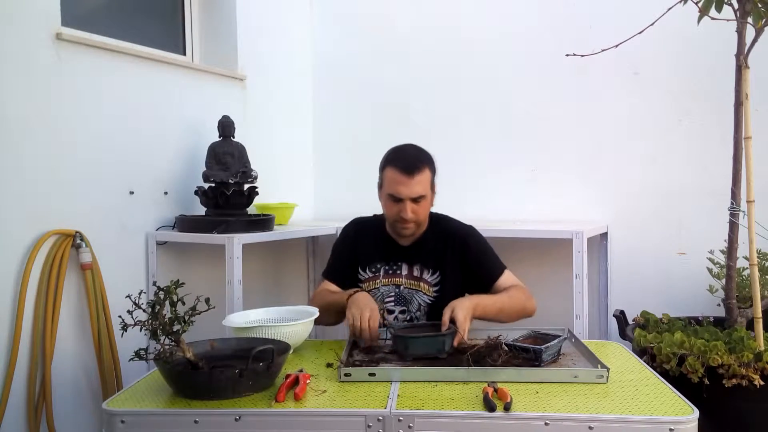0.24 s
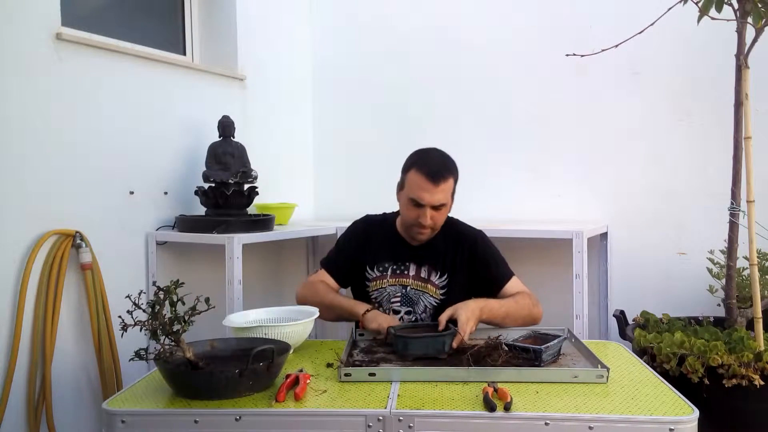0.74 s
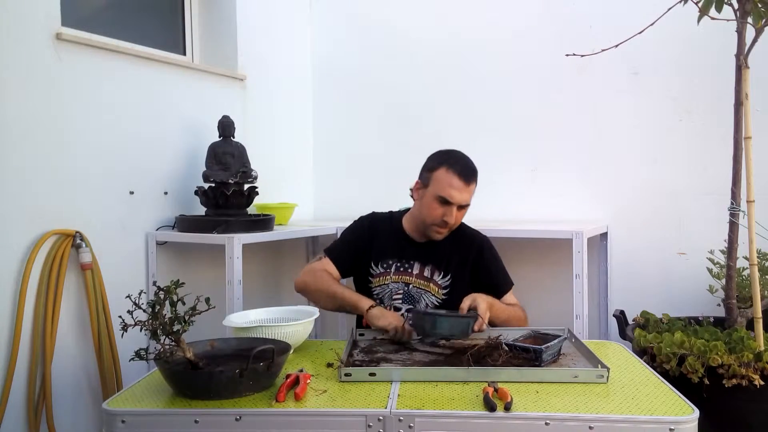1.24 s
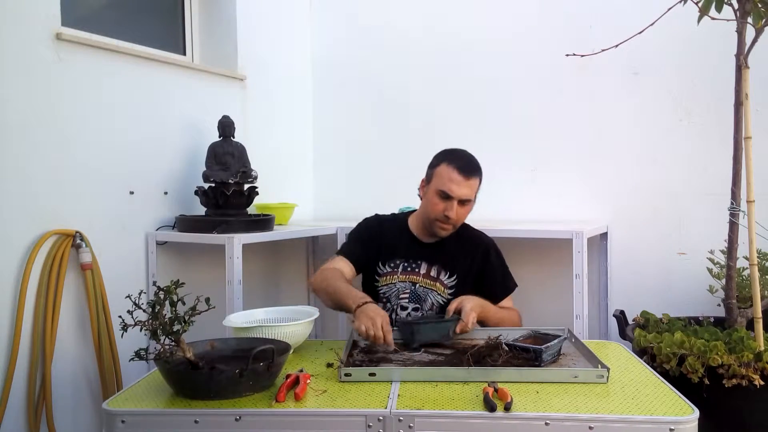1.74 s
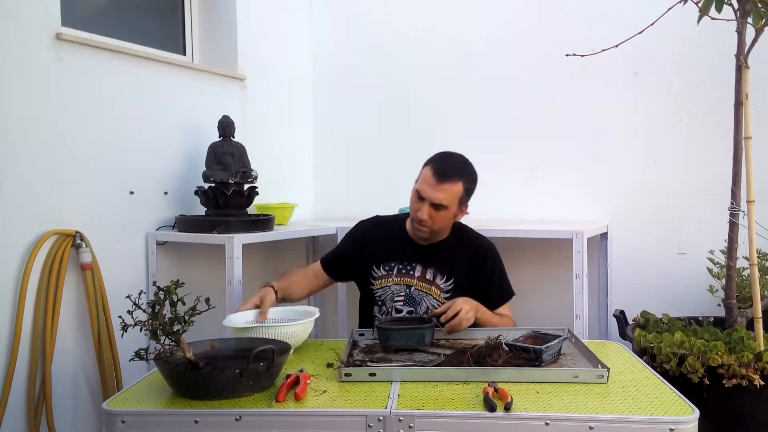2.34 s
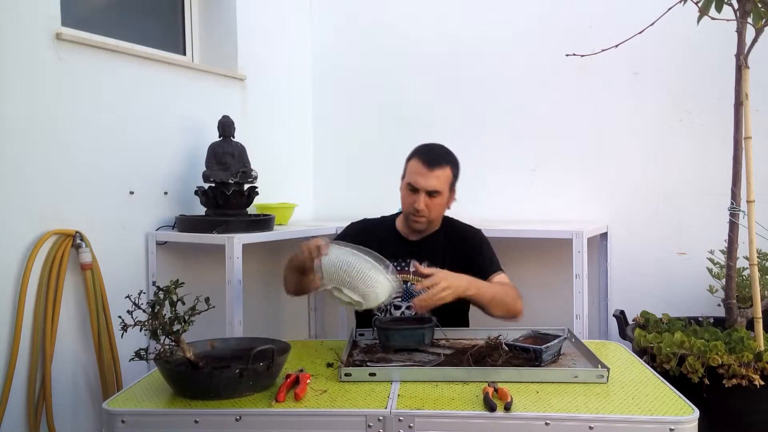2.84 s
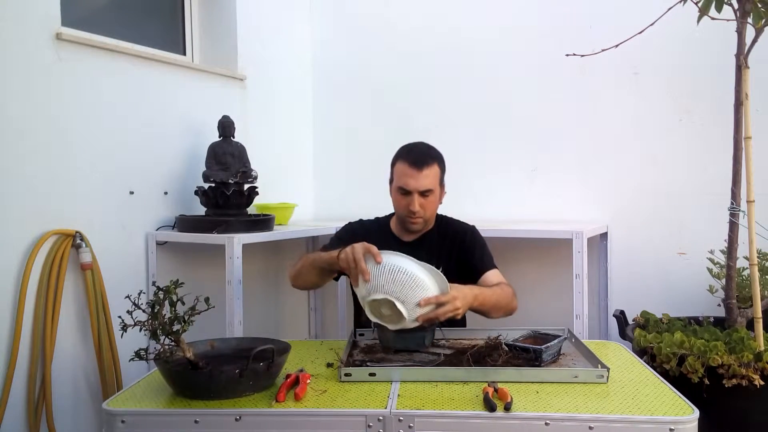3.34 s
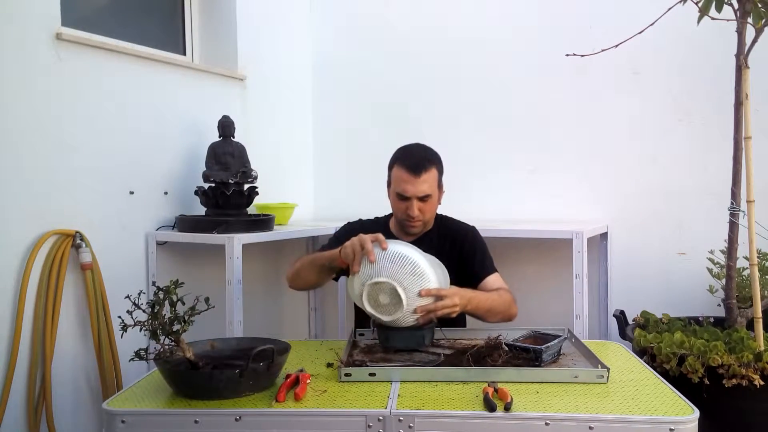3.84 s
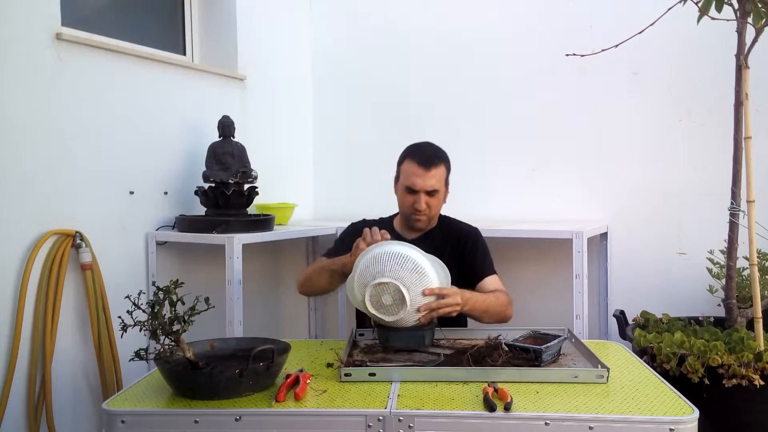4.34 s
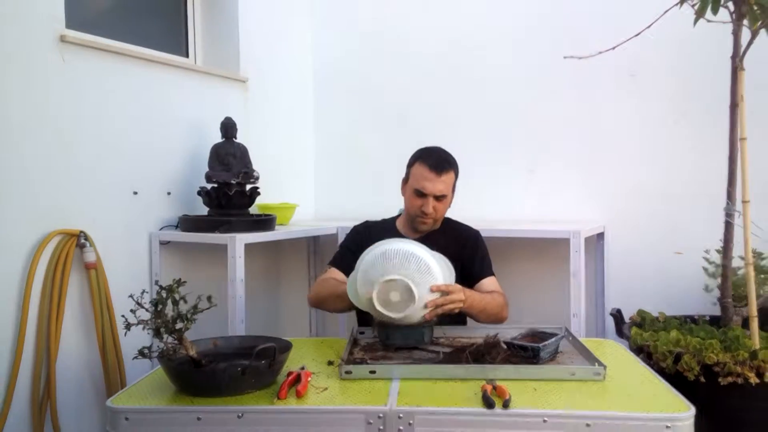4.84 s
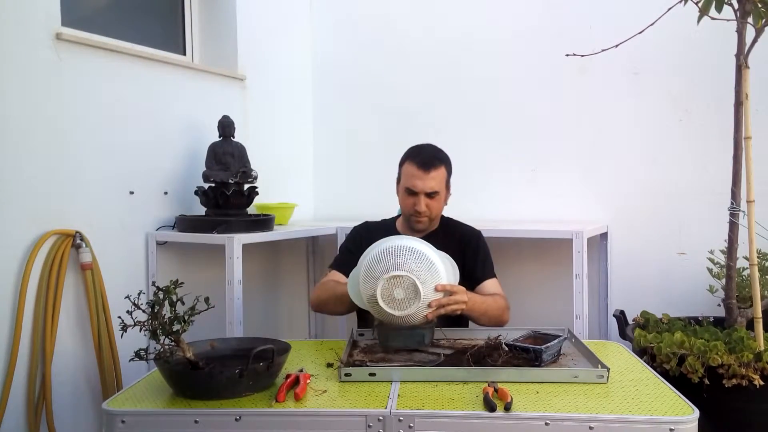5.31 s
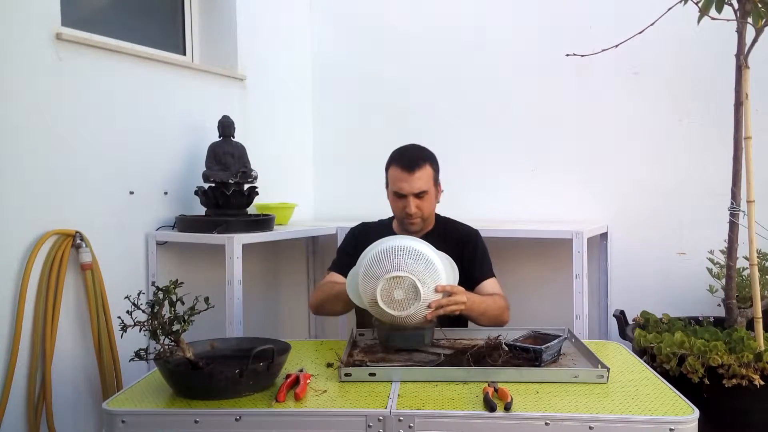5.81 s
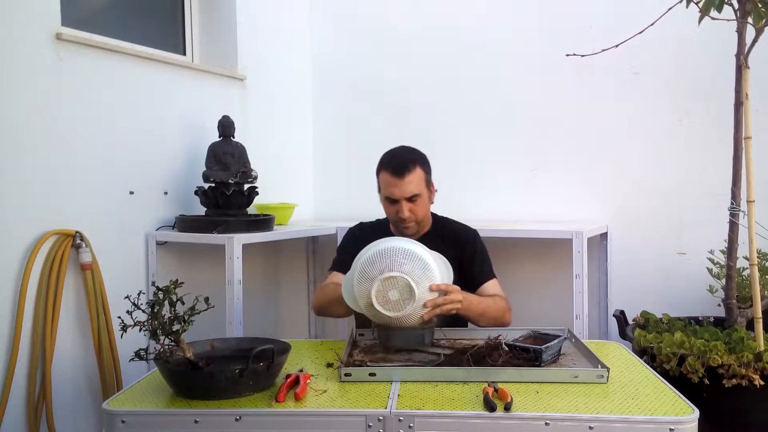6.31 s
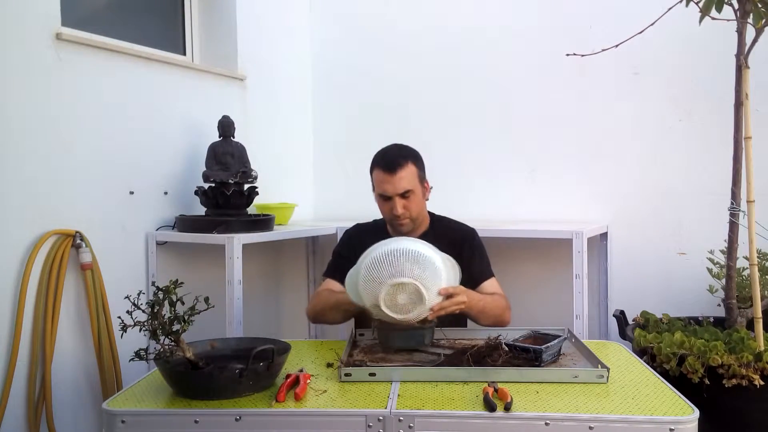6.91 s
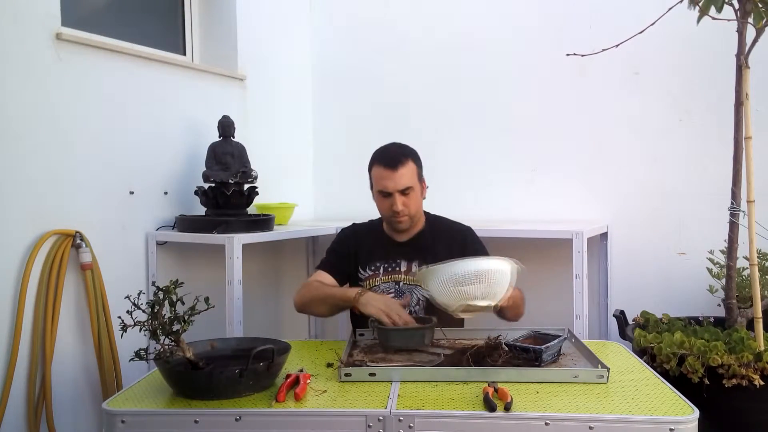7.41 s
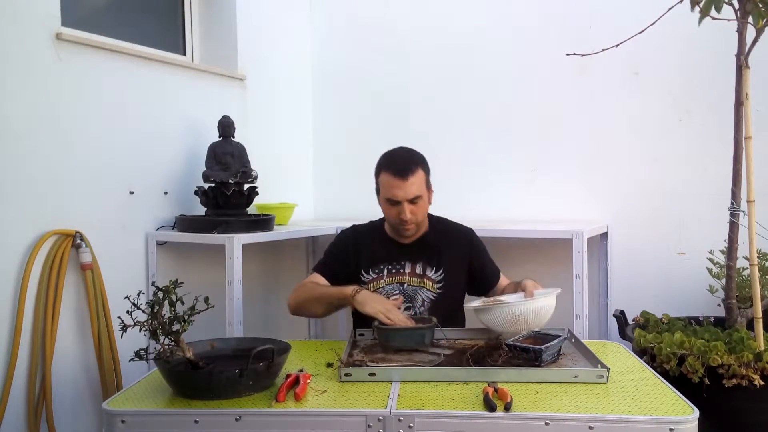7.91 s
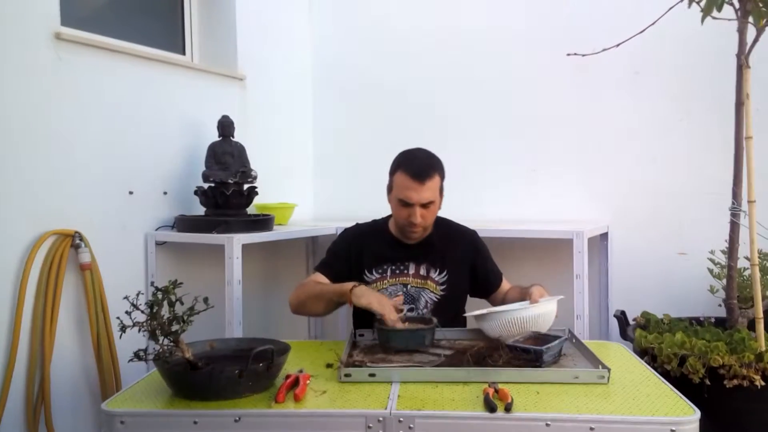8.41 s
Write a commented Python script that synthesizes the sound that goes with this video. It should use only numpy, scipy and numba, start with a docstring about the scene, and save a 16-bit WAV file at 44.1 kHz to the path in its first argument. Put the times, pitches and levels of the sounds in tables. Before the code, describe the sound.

A plastic pot knocks and scrapes on a gritty tray, a metal tool clatters down, then granules pour rattling from a plastic colander outdoors.

```python
"""A small pot is shifted and knocked on a tray, a metal tool drops, then gritty granules slide from a plastic
colander in waves, ring the hard pot and make a loose hard piece clink; faint airy swishes pass between.
Grit and rubbing are dense tiny contacts, coloured and swelled in surges; knocks and bumps are decaying noise bursts.
Pot, tool and loose piece are banks of ringing modes, and swishes are noise through a gliding resonance.
Terrace walls add a short bright echo of decaying noise bands, over a quiet outdoor floor of coloured noise."""
import sys
import numpy as np
from scipy import signal
from scipy.fft import rfft, irfft, next_fast_len
from scipy.io import wavfile
from numba import njit

SR = 44100
rng = np.random.default_rng(int(sys.argv[2]) if len(sys.argv) > 2 else 0)


def inscribe(sig):
    """Save sig as 16-bit PCM at rate SR to the path in sys.argv[1].

    A 1-D sig is mono; a 2-D sig holds one channel per row.
    Samples are clipped to [-1, 1] before scaling.
    """
    pcm = np.round(np.clip(np.atleast_2d(sig).T, -1, 1) * 32767)
    wavfile.write(sys.argv[1], SR, pcm.astype(np.int16))


N = 381906   # length [samples]

# Slides of granules and grit: (full at [s], rise [s], hold [s], fall [s], level of the mids [dB],
# treble above 6 kHz against them, before a common trim [dB], pitch of the hollow they slide in [Hz])
GRANULE_SLIDES = [(0.02, .05, .03, 0.11, -36.5, -18, 2420), (0.07, .05, 0.0084, .1, -31, -7, 3080),
                  (0.14, .02, .01, 0.082, -19.5, -13, 2650), (0.31, .02, 0.0077, 0.034, -44.5, 5, 2300),
                  (0.35, 0.044, 0.053, .05, -52.5, -15, 2800), (0.655, 0.023, 0.009, .05, -43.5, 6, 2437),
                  (0.72, 0.098, .01, 0.11, -34, -11, 2800), (0.82, .05, .11, .06, -53, -3, 2900),
                  (1.08, .06, .04, .15, -49.5, -2, 2800), (1.18, .05, 0.014, 0.24, -50.5, -7, 2850),
                  (1.4, .15, .01, 0.016, -38, -3, 3000), (2.0, .05, 0.0088, .04, -32.5, -7, 3100),
                  (2.05, .03, 0.06, 0.096, -37.5, -9, 3000), (2.48, .1, 0.013, .14, -55, 1, 3500),
                  (2.63, .1, 0.016, .15, -57.5, -36, 4500), (2.75, .05, 0.074, 0.16, -62.5, 5, 3600),
                  (3.1, .1, .02, .2, -44, 3.5, 2900), (3.24, .25, 0.091, .3, -37, 6.5, 3550),
                  (3.45, .1, 0.13, 0.29, -42, 7, 3410), (3.7, .05, .03, .15, -48, -6, 3200),
                  (3.93, .07, 0.09, 0.21, -52.5, 0, 3300), (4.15, .2, .08, .2, -36, -1.5, 3194),
                  (4.27, .1, 0.11, .25, -39.5, 3, 2917), (4.5, .1, .27, 0.34, -49.5, 2.5, 2706),
                  (4.89, .1, .02, 0.29, -45.5, 2, 2400), (5.0, .1, .03, 0.093, -49.5, 9.5, 3015),
                  (5.31, .14, .06, 0.087, -42.5, -6, 2600), (5.15, .1, 0.11, .2, -56.5, 3, 2540),
                  (5.44, .05, 0.048, .2, -53, 1.5, 2900), (5.58, .1, .05, .1, -56, -4, 2295),
                  (5.69, .04, 0.085, 0.43, -47, -1.5, 2800), (6.05, .04, .01, 0.11, -53, 2, 4200),
                  (6.17, .12, 0.062, 0.19, -48.5, 0, 2700), (6.5, 0.027, .04, .1, -48.5, -14, 3100),
                  (6.58, 0.11, .03, .1, -43, -1.5, 2250), (6.65, .05, 0.018, .08, -47, -5, 2650),
                  (6.72, .05, 0.093, 0.14, -52, -19, 3100), (6.92, 0.056, 0.088, 0.11, -61.5, -24.5, 2436),
                  (7.3, .2, .15, 0.05, -72, -12.5, 3530), (7.67, .2, 0.0091, .04, -60, -8, 2900),
                  (7.79, .1, 0.056, 0.19, -64.5, -24, 2700), (8.2, .06, 0.0072, 0.15, -53, -15.5, 2900),
                  (8.64, .1, .05, .1, -61, -4, 2700)]
# Basic tone of the granules: (frequency [Hz], level per Hz [dB])
GRIT_TONE = [(530, -59), (900, -4), (1400, -9.5), (1850, 2), (2270, 3.5), (3070, 0), (4960, -2.5),
             (9730, -19), (11400, -21.5), (13000, -32.5), (15900, -51)]


def grit():
    """Fine grit hisses and larger granules tick; both take colour from the hollow that they slide in."""
    gain, treble_db, hollow_hz = under(GRANULE_SLIDES)
    fine = rms_one(grains(5000, 2.2, 900, 16000, cycles=2.5, count=12))
    coarse = rms_one(grains(900, 3.0, 1500, 12000, cycles=6.0, count=16))
    mids, treble = split(coloured(fine + .6 * coarse, GRIT_TONE), 6000)
    # two moving resonances, at the hollow's pitch and at 1.75 times it, tint the mids
    turn = 2 * np.pi * np.maximum(hollow_hz, 500) / SR
    r = np.exp(-np.pi * 500.0 / SR)   # 500 Hz wide
    first = rms_one(moving_resonance(mids, turn, r))
    second = rms_one(moving_resonance(mids, 1.75 * turn, r))
    mids = rms_one(rms_one(mids) + .9 * first - .35 * second)
    return gain * (mids + from_db(treble_db - 9.5) * rms_one(treble))


# Runs of granules on the pot wall; where they land favours one mode:
# (full at [s], hold [s], drive of upper modes [dB], of second mode [dB], of lowest modes [dB])
POT_RUNS = [(3.36, .01, -41, -46, -47), (3.39, .04, -52, -40, -42), (3.472, 0.023, -39, -33, -44),
            (3.545, 0.052, -55, -42, -53), (3.697, 0.016, -44, -37, -50), (3.786, .01, -39.5, -54, -61),
            (3.865, .01, -52, -52, -67), (4.117, 0.051, -39, -48, -60), (4.232, 0.071, -37.5, -44, -51),
            (4.415, 0.025, -40, -40.5, -49), (4.498, 0.22, -56, -64, -54.5), (4.78, .01, -42.5, -65, -55),
            (4.964, 0.047, -49, -42, -55), (5.203, .05, -54, -64, -79), (5.454, 0.013, -49, -40, -45.5),
            (5.704, 0.091, -59, -57, -64), (5.874, .04, -52, -56, -61), (6.268, 0.048, -49.5, -47, -54),
            (6.512, 0.14, -55, -68, -62), (6.698, 0.035, -44, -44, -55.5), (6.803, 0.008, -61, -67, -66),
            (7.0, 0.021, -67.5, -69, -88), (7.125, .02, -60.5, -70, -96.5), (7.515, 0.022, -54, -45.5, -59),
            (7.598, 0.1, -75, -53.5, -56.5), (7.788, 0.096, -81, -63.5, -64.5),
            (7.954, .08, -86, -61.5, -58.5), (8.045, 0.037, -54.5, -47, -70), (8.214, .01, -66, -79.5, -54),
            (8.414, 0.053, -85.5, -49.5, -63.5), (8.563, 0.014, -51, -45, -45)]
RUN_RISE_S, RUN_FALL_S = 0.017, 0.06
# Ringing modes of the hard pot: (frequency [Hz], width [Hz], level [dB])
POT_MODES = [(1055, 80, -8), (1340, 55, 0), (2865, 90, 0), (5058, 65, 0), (7830, 60, -17), (8520, 45, -16),
             (9840, 60, -23), (10120, 60, -20), (11500, 80, -23), (12200, 45, -31)]
PATTER_FROM_S = 2.5
PATTER_DB = (-11.5, -42, -22)   # patter against the slide: upper, second, lowest modes


def pot():
    """Granules ring the hard pot: in runs, and faintly with the slide."""
    slide = under(GRANULE_SLIDES)[0] * (np.arange(N) > PATTER_FROM_S * SR)
    drives = []
    for k, patter_db in enumerate(PATTER_DB):
        runs = under([(s, RUN_RISE_S, hold, RUN_FALL_S, db[k]) for s, hold, *db in POT_RUNS])[0]
        drives.append(runs + from_db(patter_db) * slide)
    upper, second, lowest = drives
    contacts = from_db(-5.0) * clicks(900, 4.1)
    return struck(POT_MODES, contacts, lambda hz: lowest if hz < 2000 else second if hz < 4000 else upper)


# Knocks of the pot and tools on the tray: (time [s], level before a common trim [dB], low mids against it [dB],
# treble against it [dB], strongest ring [Hz], decay by 60 dB of the mids [s])
TRAY_KNOCKS = [(0.024, -25.5, -20, -18, 2300, 0.42), (0.1288, -7, 1, -4, 2700, 0.11),
               (0.291, -16, -0.5, -19, 1940, 0.057), (0.423, -31, -1.5, -23, 2880, 0.069),
               (0.441, -25, -9.5, -13.5, 2910, 0.037), (0.641, -21, 1.5, -22, 1740, 0.13),
               (0.6898, -29.5, 10.5, -6, 1840, 0.19), (0.598, -43, -15, -15, 3100, 0.1),
               (0.815, -34, 9, 3, 2680, 0.041), (0.844, -19.5, 5, -19, 3070, 0.039),
               (0.893, -28.5, 6, -16, 2600, 0.038), (0.9333, -31, -8, -15, 2580, 0.053),
               (0.9581, -19, 2.5, -14, 2640, 0.049), (1.016, -26, 6.5, -25, 1680, 0.038),
               (1.0705, -25, 5.5, -16, 2800, 0.094), (1.1336, -28, -8, -15, 2600, 0.16),
               (1.1618, -18.5, 2, -3, 2700, 0.052), (1.2797, -28.5, -1, -6, 2630, 0.11),
               (1.3146, -24.5, -1, -23, 2580, 0.18), (1.3486, -31, -11, -8, 2600, 0.22),
               (1.3825, -13, -17, -13, 3000, 0.056), (1.396, -22, -16, -5, 4260, 0.034),
               (1.8572, -1.5, -5.5, -10, 4750, 0.057), (1.938, -23.5, -4, -24, 2820, 0.21),
               (1.9607, -12, -2.5, -7.5, 4240, 0.095), (2.0177, -16, -7, -32, 3340, 0.065),
               (2.033, -2.5, -9, -6.5, 3030, 0.067), (2.33, -42.5, -0.5, -35, 3230, 0.08),
               (2.351, -35, -13, -41, 3280, 0.026), (2.431, -37, -5, -10, 4870, 0.051),
               (2.466, -44, 0, -4, 4360, 0.22), (2.73, -42.5, 0, 15.5, 4720, 0.031),
               (2.8634, -47, -19, -3, 4280, 0.27), (3.389, -23, -11, -5, 3450, 0.024),
               (3.412, -33, 7, -25, 3430, 0.031), (3.4855, -35, -2, -23, 3430, .049),
               (6.788, -20, -14, -24, 2700, 0.039), (7.8452, -40, -3.5, -17, 1960, 0.084),
               (8.145, -39, -5, -28.5, 2700, 0.11), (8.1805, -40.5, -6, -8, 2640, 0.29),
               (8.286, -40, 3, -25, 3000, 0.031), (8.565, -7.5, -7, -14, 3220, 0.042)]
KNOCK_RISE_MS, RISE_AT_HZ, RISE_POWER = 3.2, 2600, 1   # knocks that ring higher rise faster
# Single large granules landing: (time [s], level before the same trim [dB], treble against it [dB],
# strongest ring [Hz])
GRANULE_TICKS = [(2.9323, -33.5, -6, 2420), (3.042, -44, -5, 2480), (3.072, -25.5, -23, 2780),
                 (3.146, -21, -4, 2400), (3.182, -24, 1, 2600), (3.303, -31, -13, 4050),
                 (3.627, -34, -21, 3410), (3.707, -17, -1.5, 3350), (3.7714, -29, -8, 5440),
                 (3.854, -34, 14, 5370), (3.913, -37, -11, 3400), (3.9695, -32, -3, 3320),
                 (4.0282, -24, -10, 2290), (4.0614, -25, -23, 5900), (4.087, -18.5, -22, 5250),
                 (4.115, -36, -17, 5440), (4.1749, -31, -19, 5130), (4.368, -26, -20, 2820),
                 (4.6488, -33, -22, 2860), (4.9736, -37, 6.5, 5100), (4.999, -35, 11.5, 2880),
                 (5.1363, -31.5, -15, 2240), (5.3113, -25, -11, 2690), (5.4028, -31, -7, 3000),
                 (5.462, -29, -5, 2830), (5.644, -29, -24, 2350), (5.678, -28, -6, 2780),
                 (5.7267, -31.5, -5, 2220), (5.752, -27.5, -8, 2450), (5.871, -27, -7.5, 2870),
                 (5.9214, -39, -2, 5060), (6.0278, -39.5, 7, 4760), (6.1794, -27, -6.5, 2300),
                 (6.264, -38.5, 4, 5160), (6.3104, -35, -10, 3030), (6.4886, -33, -35, 3030),
                 (6.5466, -27.5, -31, 3670), (6.567, -23.5, -14, 1870), (6.6864, -34, -24, 4960),
                 (6.9204, -38, -17, 2860), (6.9608, -35.5, -41.5, 2420), (6.984, -42, -29.5, 2600),
                 (7.025, -54, -30, 2390), (7.6794, -46, -8, 2800), (7.6987, -29.5, 3, 2870),
                 (8.044, -42, -26, 2770), (8.082, -38, -27, 5100)]
TICK_LOW_DB, TICK_T60_S, TICK_RISE_MS = -31, 0.037, 0.9
# Tone of the contact noise: (frequency [Hz], level per Hz [dB])
KNOCK_TONE = [(24, -71), (40, -41), (363, -12), (515, -5.5), (871, -4), (1240, -7), (1800, 1), (2690, 5),
              (4550, 6), (6630, -5), (10100, 0.5), (12400, -10), (14500, -17), (15900, -33.5)]


def knocks():
    """A burst of contact noise around the ring of the struck spot; its lows outlast its treble."""
    size = 9000
    out, t = np.zeros(N + size), np.arange(size) / SR
    noise = through_tray(coloured(np.resize(clicks(6000, 2.1), N + size), KNOCK_TONE), share=0.15)
    lows, rest = split(noise, 1400)
    mids, treble = split(rest, 5500)
    lows, mids, treble = rms_one(lows), rms_one(mids), rms_one(treble)
    blows = [(*row, KNOCK_RISE_MS * (RISE_AT_HZ / row[4]) ** RISE_POWER) for row in TRAY_KNOCKS]
    blows += [(s, db, TICK_LOW_DB, treble_db, hz, TICK_T60_S, TICK_RISE_MS)
              for s, db, treble_db, hz in GRANULE_TICKS]
    for s, level_db, low_db, treble_db, ring_hz, t60, rise_ms in blows:
        at = round(s * SR)
        here = slice(at, at + size)
        rise = 1 - np.exp(-t / (rise_ms / 1000))
        spot = mids[here] + 0.65 * rms_one(resonance(mids[here], ring_hz, 210.0))
        # each part: noise, level [dB], decay time against that of the mids
        for part, db, longer in ((lows[here], low_db, 1.4), (spot, 0, 1.0), (treble[here], treble_db, .7)):
            out[here] += part * rise * from_db(level_db + db - 10.0 - 60 * t / (t60 * longer))
    return out[:N]


# Bounces of the dropped tool; how it lands favours some modes:
# (time [s], drive of lowest mode [dB], of middle modes [dB], of modes above 5 kHz [dB])
TOOL_BOUNCES = [(2.04, -45, -45, -34), (2.08, -47, -28, -26.5), (2.15, -49.5, -42, -48),
                (2.195, -50, -46.5, -55), (2.255, -45.5, -60, -67)]
BOUNCE_RISE_S, BOUNCE_FALL_S = 0.048, 0.064
# Ringing modes of the metal tool: (frequency [Hz], width [Hz], level [dB])
TOOL_MODES = [(1925, 3, -9), (2920, 35, -2), (3130, 25, -8), (3660, 24, -1), (3730, 24, -3),
              (4260, 70, -13), (5550, 35, -14), (6500, 38, -9), (7400, 40, -20), (8030, 40, -18),
              (8320, 45, -18), (8610, 45, -20), (9890, 40, -21), (10200, 50, -15), (10600, 50, -20),
              (11400, 45, -20), (12400, 45, -19), (13700, 45, -20), (15300, 40, -32)]


def tool():
    """The dropped tool rattles around each bounce and its metal modes ring out."""
    lowest, middle, upper = [under([(s, BOUNCE_RISE_S, 0, BOUNCE_FALL_S, db[k]) for s, *db in TOOL_BOUNCES])[0]
                             for k in range(3)]
    return struck(TOOL_MODES, clicks(700, 2.5),
                  lambda hz: lowest if hz < 2400 else middle if hz < 5000 else upper)


# Touches of the loose hard piece: (time [s], bare tick before trim and filters [dB],
# drive of lowest mode [dB], of upper modes [dB])
CLINK_TOUCHES = [(3.3769, -34.5, -51, -49), (3.39, -21, -40, -46), (3.4138, -21, -20, -28),
                 (3.4233, -22, -26, -38), (3.4427, -22, -25, -26), (3.484, -20, -20.5, -21),
                 (3.557, -21.5, -26, -22.5), (3.5989, -5, -30, -38), (3.6258, -25, -27, -44),
                 (3.6404, -34, -51, -28), (3.6913, -30, -46, -33), (3.7071, -27, -51, -37),
                 (3.7281, -25, -32, -36), (3.77, -26, -27, -26.5), (3.801, -25, -51, -42),
                 (3.8556, -22, -24, -24), (3.9133, -17, -32.5, -47), (3.9294, -36, -61, -36),
                 (3.966, -38, -56, -52), (4.01, -25, -53, -52), (4.029, -37, -48, -36),
                 (4.0598, -23, -28.5, -27.5), (4.0895, -18, -49, -33), (4.1154, -22, -51, -34),
                 (4.1222, -18, -32, -23.5), (4.155, -22, -41, -38), (4.175, -27, -43, -43),
                 (4.195, -25, -42, -34), (4.247, -20, -31, -28.5), (4.27, -19, -35, -26),
                 (4.366, -30, -54, -45), (4.4175, -30, -53, -52)]
# Ringing modes of that piece: (frequency [Hz], level [dB], decay by 60 dB [s])
PIECE_MODES = [(3425, 4, .027), (5645, 0, .055), (7440, -10, .035), (8730, -19, .05), (9880, -21, .04),
               (10110, -16, .04), (12720, -28, .05)]


def clinks():
    """Each touch starts every mode and is followed by small bounces; where it lands sets the lowest mode."""
    s, tick_db, lowest_db, upper_db = np.transpose(CLINK_TOUCHES)
    chance_db = rng.normal(0, 1.3, (len(s), len(PIECE_MODES)))
    at = np.round(s * SR).astype(int)
    bounces = .035 * clicks(400, 2.5)
    ticks = np.zeros(N)
    ticks[at] = from_db(tick_db - 12)
    out = split(ticks, 7000)[0]   # the bare tick of the contact
    for k, (hz, db, t60) in enumerate(PIECE_MODES):
        drive_db = lowest_db if k == 0 else upper_db + chance_db[:, k] * (k > 1)
        hits = np.full(N, 1e-18)
        hits[at] = from_db(db + drive_db)
        # bounces die away after each touch with a 19 ms time constant
        hits += bounces * signal.lfilter([1], [1, -np.exp(-1 / (0.019 * SR))], hits)
        r, turn = from_db(-60 / (t60 * SR)), 2 * np.pi * hz / SR
        out += signal.lfilter([0, np.sin(turn)], [1, -2 * r * np.cos(turn), r * r], hits)
    without_bass = split(out, 2560)[1]   # a small piece radiates no bass
    return split(without_bass, 10700)[0]   # the touches are not quite sharp


# Dull bumps of the hollow colander and pot: (time [s], level before a common trim [dB], ring [Hz],
# decay by 60 dB [s])
HOLLOW_BUMPS = [(1.66, -48, 904, 0.15), (2.347, -42, 775, 0.067), (2.594, -38, 1000, 0.19),
                (2.851, -47.5, 723, 0.39), (3.175, -53, 930, 0.08), (3.585, -33, 1080, 0.13),
                (3.703, -37.5, 1090, 0.16), (4.053, -41.5, 894, 0.13), (4.086, -50, 1010, 0.08),
                (4.16, -33, 1030, 0.076), (4.553, -32.5, 540, 0.042), (4.574, -40.5, 190, 0.11),
                (4.677, -33.5, 560, 0.085), (4.71, -38, 620, 0.067), (4.745, -37, 560, 0.12),
                (4.72, -42, 200, 0.12), (5.32, -47, 1040, 0.097), (5.713, -53, 869, 0.07),
                (5.938, -47, 816, 0.09), (6.598, -53, 856, 0.067), (6.647, -40, 1070, 0.09),
                (6.656, -51, 250, 0.13), (7.394, -51.5, 494, 0.1), (7.469, -50.5, 921, 0.092),
                (7.739, -48, 895, 0.14), (7.841, -43, 616, 0.074), (8.137, -45, 121, 0.12),
                (8.152, -41, 221, 0.12)]


def bumps():
    """A soft contact: a short noise push into one broad, low ring."""
    size = 9000
    out, t = np.zeros(N + size), np.arange(size) / SR
    for s, level_db, ring_hz, t60 in HOLLOW_BUMPS:
        push = split(rng.standard_normal(size), 1630)[0]
        body = rms_one(resonance(push, ring_hz, 0.4 * ring_hz))
        at = round(s * SR)
        rise = 1 - np.exp(-t / 0.0031)
        out[at:at + size] += body * rise * from_db(level_db - 10 - 60 * t / t60)
    return out[:N]


# Rubs and shakes of the tray, pot and colander walls: (full at [s], rise [s], hold [s], fall [s],
# level above 350 Hz [dB], bass below 350 Hz against it, before a common trim [dB])
WALL_RUBS = [(0.03, 0.14, 0.095, .1, -40, -27), (0.14, 0.047, 0.0057, 0.071, -27.5, 3.5),
             (0.31, 0.3, 0.0054, 0.16, -48.5, 5.5), (0.65, 0.055, 0.022, .1, -43, -12),
             (0.72, 0.11, .01, 0.2, -40, -6.5), (0.91, 0.074, 0.0083, 0.051, -47.5, -19),
             (0.96, 0.007, 0.015, 0.11, -57.5, 21.5), (1.08, 0.091, 0.046, 0.31, -51.5, 3),
             (1.24, 0.14, 0.026, .1, -49.5, -7.5), (1.4, 0.079, .01, 0.19, -61, 2.5),
             (1.71, 0.28, 0.0069, .16, -71, 0), (1.87, .01, .03, 0.15, -65, 24),
             (2.05, 0.058, 0.05, 0.1, -43, -0.5), (2.41, 0.081, 0.45, .2, -62.5, -8),
             (2.485, .01, 0.023, .04, -63.5, 11), (2.8, 0.18, .01, 0.22, -63.5, 0),
             (2.92, .02, 0.061, 0.12, -69.5, 13.5), (3.04, 0.022, 0.023, .06, -73.5, 12),
             (3.18, 0.17, 0.0078, 0.11, -56, -9), (3.35, 0.13, 0.036, .1, -55, -19),
             (3.4, .02, 0.12, 0.1, -50, -3), (3.57, 0.12, 0.023, 0.16, -57, -30),
             (3.7, .1, .05, 0.37, -66, -15), (4.07, .04, 0.12, .1, -66, -8),
             (4.2, 0.079, 0.099, 0.34, -52.5, -17), (4.23, .03, .07, .04, -61, 5),
             (4.58, .1, .01, 0.036, -56, -2), (4.73, 0.059, 0.082, 0.034, -58, -2),
             (4.8, 0.21, 0.056, 0.62, -54.5, -16), (5.35, .1, 0.0092, 0.078, -60, -29),
             (5.72, .03, 0.07, 0.11, -62.5, -13), (5.85, 0.12, 0.081, .1, -58, -24),
             (6.0, .05, .1, .1, -73, -15), (6.27, .05, .06, 0.085, -71, -20),
             (6.6, .06, .03, 0.14, -54.5, -21), (6.67, .02, 0.025, 0.034, -61, 7),
             (7.47, .1, .04, 0.053, -70, -2.5), (7.6, 0.085, 0.035, .05, -64.5, -18.5),
             (7.74, 0.1, 0.074, 0.11, -67.5, -10.5), (7.86, 0.035, 0.033, 0.094, -67, 2),
             (8.15, 0.032, 0.012, 0.19, -61, 6.5), (8.59, 0.032, 0.0072, 0.06, -60, 22.5)]
# Tone of the rubbing: (frequency [Hz], level per Hz [dB])
RUB_TONE = [(24, -71.5), (40, -37), (137, -11), (293, -12.5), (421, -6), (671, 5.5), (784, 12), (1020, 7),
            (1320, 9), (2500, -2.5), (3250, -35), (5500, -120)]


def rub():
    """Sparser, softer contacts drive the hollow plastic walls."""
    gain, bass_db = under(WALL_RUBS)
    contacts = coloured(grains(1500, 3.9, 58, 2800, cycles=2.2, count=14), RUB_TONE)
    bass, mids = split(through_tray(contacts, share=0.36), 350)
    return gain * (rms_one(mids) + from_db(bass_db - 0.5) * rms_one(bass))


# Modes of the tray and what stands on it: (frequency [Hz], width [Hz], level [dB])
TRAY_MODES = [(510, 300, -4.5), (1075, 25, 0.5), (1204, 23, -2.5), (1360, 7.7, -15.5), (1410, 5.7, -11),
              (2110, 46, -1.5), (2630, 120, 2), (2910, 110, 14), (3170, 120, -1.5), (4370, 42, -15),
              (4800, 15, -15), (5060, 46, -12), (12400, 900, -0.5)]


def through_tray(x, share):
    """The tray and what stands on it favour their own modes."""
    ringing = sum(from_db(db) * resonance(x, hz, width) for hz, width, db in TRAY_MODES)
    return rms_one(x + share * rms_one(ringing))


# Faint airy swishes around one pitch: (full at [s], rise [s], hold [s], fall [s], level [dB], pitch [Hz])
AIRY_SWISHES = [(1.52, .1, 0.24, .15, -74.5, 4320), (2.62, 0.033, 0.053, .1, -66, 4750),
                (5.53, .05, 0.092, 0.11, -57, 2250), (6.04, .03, 0.045, 0.097, -57, 4740),
                (7.23, 0.046, 0.018, .3, -66, 4770), (7.33, .25, 0.022, .3, -71, 4380),
                (7.43, 0.38, .04, 0.072, -69.5, 4140)]
SWISH_WIDTH_HZ = 600.0   # of each of two passes


def swishes():
    """Smooth noise through one resonance, taken twice, that glides from swish to swish."""
    gain, hz = under(AIRY_SWISHES)
    turn, r = 2 * np.pi * np.maximum(hz, 500) / SR, np.exp(-np.pi * SWISH_WIDTH_HZ / SR)
    once = moving_resonance(rng.standard_normal(N), turn, r)
    return gain * rms_one(moving_resonance(once, turn, r))


# Echo of the terrace walls: (frequency [Hz], decay by 60 dB [s])
ECHO_DECAY = [(100, 0.15), (1000, .25), (4000, 0.19), (12000, 0.15)]
ECHO_DB = -7


def terrace(x):
    """Diffuse echo from the walls: half-octave noise bands, each dying at its own rate."""
    t, tail = np.arange(SR // 2) / SR, 0
    edges = 60 * 2 ** np.arange(0, 8.6, .5)
    for low, high in zip(edges, np.minimum(edges[1:], .45 * SR)):
        bandpass = signal.butter(2, [low, high], "band", fs=SR, output="sos")
        band = signal.sosfilt(bandpass, rng.standard_normal(len(t)))
        tail = tail + band * from_db(-60 * t / at_hz(ECHO_DECAY, np.sqrt(low * high)))
    tail *= t > .003   # the nearest wall is a metre further than the direct path
    return signal.fftconvolve(x, tail / np.sqrt(np.sum(tail ** 2)))[:N]


# Tone of the outdoor floor: (frequency [Hz], level per Hz [dB])
AIR_TONE = [(8.8, -39.5), (15, -12.5), (195, -3), (496, -5), (1340, -9), (1840, -17), (2130, -11),
            (3500, -13), (5110, -15.5), (15900, -17.5)]
AIR_DB = -70


def outdoor_air():
    """Steady coloured noise makes the quiet outdoor floor."""
    return from_db(AIR_DB) * coloured(rng.standard_normal(N), AIR_TONE)


def struck(modes, hits, favour):
    """One body: the same contacts reach every mode, each with its own strength; soft contacts start it gently."""
    strength, out = rng.uniform(.3, 1.5, N), 0
    for k, (hz, width, db) in enumerate(modes):
        drive = hits * favour(hz) * np.roll(strength, k) + 1e-18
        soft = resonance(drive, hz, hz / 8) * np.sqrt(np.pi * hz / 8 / SR)
        out = out + from_db(db) * resonance(soft, hz, width)
    return out


def grains(per_s, spread_db, low_hz, high_hz, cycles, count):
    """Each grain rings a few cycles at a pitch dealt at random; flat per Hz."""
    hits, dealt = clicks(per_s, spread_db), rng.integers(0, count, N)
    out = 0
    for k, hz in enumerate(np.geomspace(low_hz, high_hz, count)):
        out = out + np.sqrt(hz) * resonance(hits * (dealt == k) + 1e-18, hz, hz / cycles)
    return out


def clicks(per_s, spread_db):
    """Random contacts, many small and few large."""
    sizes = from_db(spread_db * np.minimum(rng.exponential(1, N), 5)) * rng.choice([-1, 1], N)
    return rms_one(sizes * (rng.random(N) < per_s / SR)) + 1e-18


RISE_DB, FALL_DB = 25, 20   # what a surge gains in its rise and loses in its fall


def surges(s, rise, hold, fall, db):
    """Power of each surge, rising, holding and falling straight in dB, on a 1 ms grid of times."""
    t = np.arange(0, N / SR + .002, .001)[:, None]
    early, late = np.maximum(s - t, 0), np.maximum(t - s - hold, 0)
    power = from_db(db - RISE_DB * early / rise - FALL_DB * late / fall) ** 2
    return power, t[:, 0]


def under(rows):
    """Gain of overlapping surges at every sample, and the other columns averaged by surge power."""
    s, rise, hold, fall, db, *columns = np.transpose(rows)
    power, t = surges(s, rise, hold, fall, db)
    total = power.sum(axis=1) + 1e-30
    curves = [np.sqrt(total)] + [(power @ column) / total for column in columns]
    return [np.interp(np.arange(N) / SR, t, curve) for curve in curves]


def resonance(x, hz, width_hz):
    """A two-pole resonance; white noise keeps about its rms."""
    r = np.exp(-np.pi * width_hz / SR)
    feed = np.sqrt((1 - r * r) / 2) * np.array([1, 0, -1])
    return signal.lfilter(feed, [1, -2 * r * np.cos(2 * np.pi * hz / SR), r * r], x)


@njit
def moving_resonance(x, turn, r):
    """A two-pole resonance whose centre (radians a sample) follows a curve."""
    y = np.zeros(len(x))
    for i in range(2, len(x)):
        y[i] = x[i] - x[i - 2] + 2 * r * np.cos(turn[i]) * y[i - 1] - r * r * y[i - 2]
    return y


def coloured(x, points):
    """x shaped by a spectrum; rms 1."""
    size = next_fast_len(len(x))
    gain = from_db(at_hz(points, np.fft.rfftfreq(size, 1 / SR)))
    return rms_one(irfft(rfft(x, size) * gain, size)[:len(x)])


def at_hz(points, hz):
    """A curve over frequency, read on a log axis."""
    points_hz, values = np.transpose(points)
    return np.interp(np.log(np.maximum(hz, 1)), np.log(points_hz), values)


def split(x, hz):
    """Parts below and above hz."""
    return [signal.sosfilt(signal.butter(4, hz, side, fs=SR, output="sos"), x) for side in ("low", "high")]


def rms_one(x):
    """Scaled to rms 1."""
    return x / np.sqrt(np.mean(x ** 2) + 1e-20)


def from_db(db):
    """Decibels to gain."""
    return 10 ** (np.asarray(db) / 20)


def scene():
    """All sources on the table, their echo and the air."""
    granules = grit()
    blows = pot() + knocks() + tool() + clinks() + bumps()
    echo = from_db(ECHO_DB) * terrace(blows + 0.68 * granules)
    return (granules + blows + rub() + swishes() + echo + outdoor_air())[None]


def record(dry):
    """The loudest peaks are rounded, the top is cut."""
    rounded = .9 * np.tanh(dry / .9)
    top_cut = signal.cheby2(14, 70, 16350, fs=SR, output="sos")   # 70 dB down from 16350 Hz
    return signal.sosfilt(top_cut, rounded)


dry = scene()
out = record(dry)
inscribe(out)
```